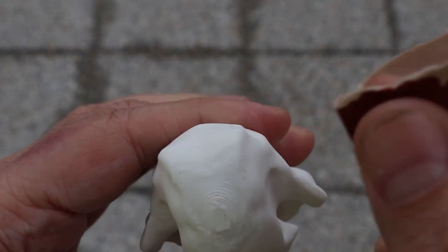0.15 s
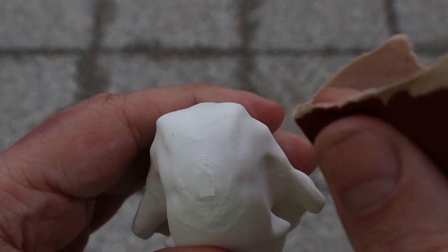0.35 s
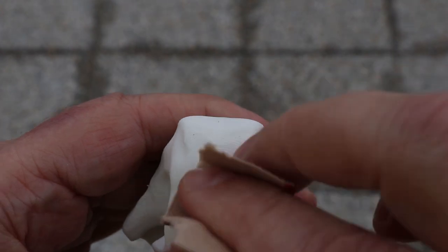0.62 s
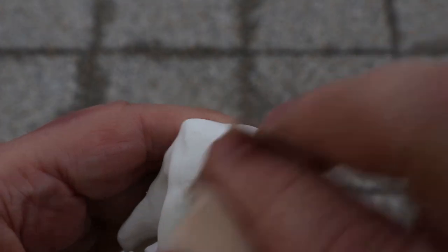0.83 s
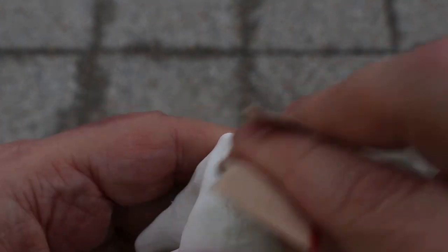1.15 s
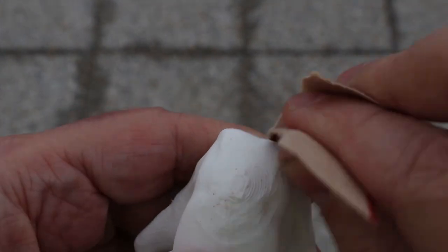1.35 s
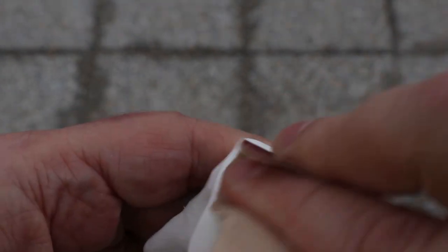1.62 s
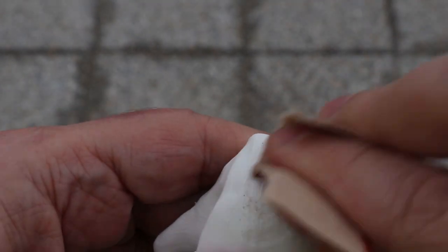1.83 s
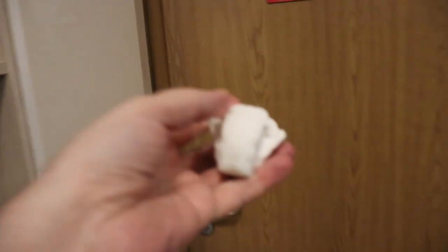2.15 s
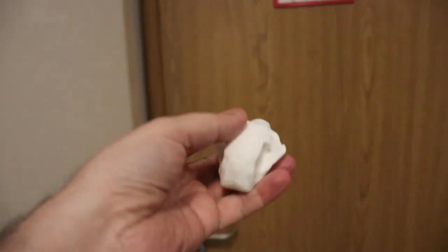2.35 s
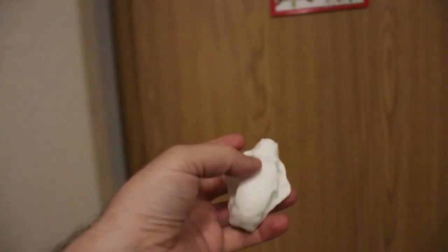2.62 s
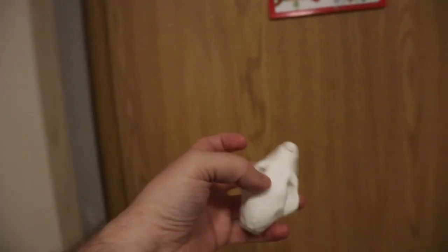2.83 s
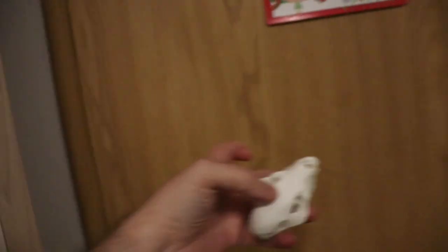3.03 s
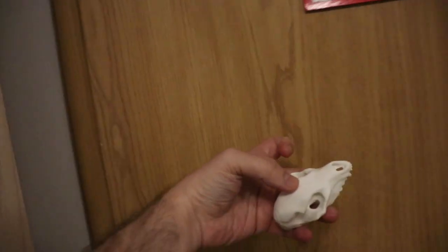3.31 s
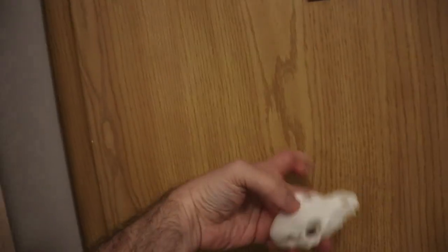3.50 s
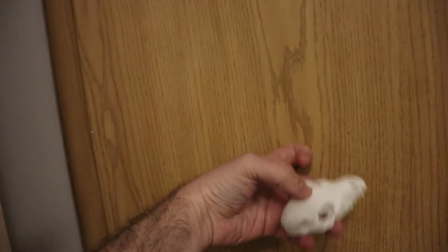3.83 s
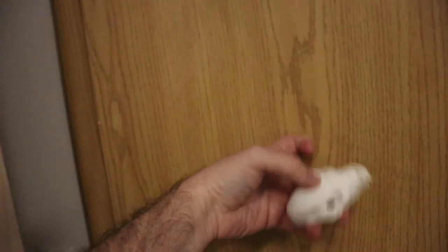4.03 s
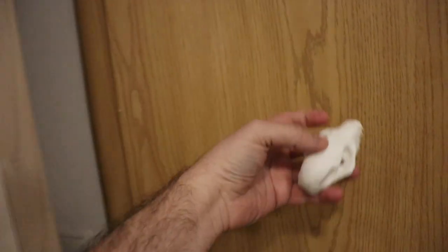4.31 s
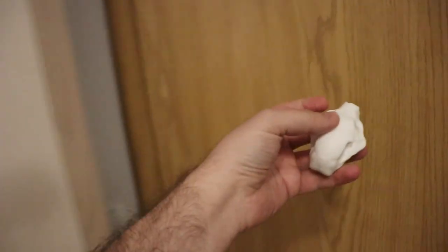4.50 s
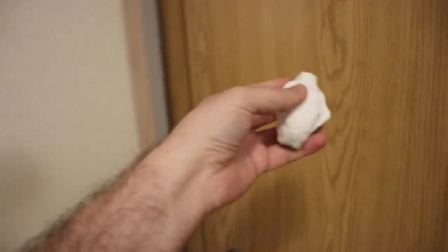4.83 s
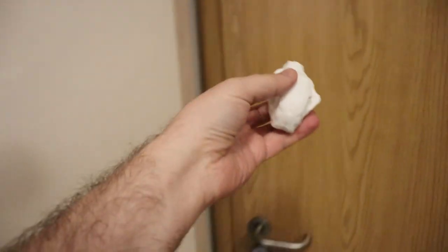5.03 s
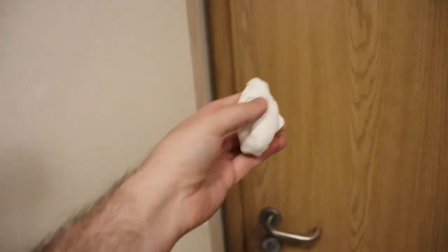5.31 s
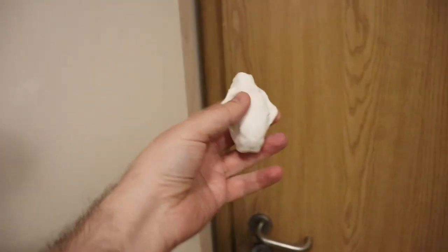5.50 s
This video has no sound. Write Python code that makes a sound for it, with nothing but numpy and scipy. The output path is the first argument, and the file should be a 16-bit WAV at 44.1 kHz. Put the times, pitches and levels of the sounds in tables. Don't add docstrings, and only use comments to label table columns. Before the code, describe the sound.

Close-up outdoors, faint traffic and brief sparrow chirps precede dry, scratchy sandpaper strokes with sharp grit snaps. A hard cut leads to a quiet hall: soft sleeve rustle and small taps, three evenly spaced knocks on a wooden door, then a small rattle and two short clacks. A handheld camera microphone adds hiss and low handling rumble.

```python
import sys
import numpy as np
from scipy import signal
from scipy.fft import rfft, irfft
from scipy.io import wavfile
from scipy.ndimage import uniform_filter1d

SR = 44100
rng = np.random.default_rng(int(sys.argv[2]) if len(sys.argv) > 2 else 0)


def nominal_scale(level):
    x = np.asarray(level, float) / 20
    return 10 ** x


def bounce(signal):
    frames = np.transpose(np.atleast_2d(signal))
    limited = np.clip(frames, -1, 1)
    pcm = np.round(limited * 32767).astype(np.int16)
    wavfile.write(sys.argv[1], SR, pcm)


N = 249332
CHANGE_S = 1.982


def time():
    return np.arange(N) / SR


def band(x, hz, width_hz, order=1):
    b, a = signal.iirpeak(min(hz, .45 * SR), hz / width_hz, SR)
    for _ in range(order):
        x = signal.lfilter(b, a, x)
    return x


def unit(x):
    return x / np.sqrt(np.mean(x ** 2))


def noise(colour):
    hz, db = np.transpose(colour)
    bins = np.fft.rfftfreq(N, 1 / SR) + 1
    gain = nominal_scale(np.interp(np.log(bins), np.log(hz), db))
    return unit(irfft(rfft(rng.standard_normal(N)) * gain, N))


def walk(rate):
    k = int(SR / rate)
    held = np.repeat(rng.standard_normal(N // k + 1), k)
    return uniform_filter1d(held, k)[:N]


def grains(rate, spread_db, bed):
    sizes = nominal_scale(spread_db * np.minimum(rng.exponential(size=N), 2.5))
    clicks = (rng.random(N) < rate / SR) * sizes * rng.standard_normal(N)
    return unit(clicks) + bed * rng.standard_normal(N)


def swells(rows, roundness):
    s, length, db, rising = np.array(rows).T[:4, :, None]
    u, rising = np.clip((time() - s) / length, 0, 1), np.clip(rising, .02, .98)
    turn = np.where(u < rising, u / rising, (1 - u) / (1 - rising))
    return nominal_scale(db) * np.sin(turn * np.pi / 2) ** roundness


def blend(gains, db=0):
    offsets = nominal_scale(np.reshape(db, (-1, 1)))
    return np.sqrt(np.sum((gains * offsets) ** 2, axis=0))


def add(out, s, x, db):
    i = int(s * SR)
    x = x[:N - i]
    out[i:i + len(x)] += x * nominal_scale(db) / np.abs(x).max()


def wash(bands):
    t = np.arange(SR // 2) / SR
    tail = 0
    for hz, width_hz, db, t60 in bands:
        tone = unit(band(rng.standard_normal(len(t)), hz, width_hz, order=2))
        tail = tail + nominal_scale(db - 60 * t / t60) * tone
    tail = tail * (1 - np.exp(-(t / 0.00065) ** 2))
    return tail / np.sqrt(np.sum(tail ** 2))


def ring(modes, shorten):
    t = np.arange(SR // 2) / SR
    return sum((-1) ** k * nominal_scale(db - 60 * t / min(t60 * shorten, .5)) * np.sin(2 * np.pi * hz * t)
               for k, (hz, db, t60) in enumerate(modes))


def push(ms):
    return np.hanning(int(ms * SR / 1000) + 3) ** 2


def sparrows():
    # start in seconds, length in seconds, first pitch in Hz, last pitch in Hz, level in dB.
    chirps = [(.156, .01, 4200, 5600, -76), (.166, .058, 5650, 4750, -64), (.235, .02, 5300, 4800, -71),
              (.262, .02, 3800, 4700, -66), (.282, .04, 4700, 4400, -73), (.638, .01, 4500, 5700, -78),
              (.648, .055, 5700, 4600, -71), (.738, .022, 4300, 4800, -71), (.87, .03, 3400, 5400, -67),
              (.905, .023, 4500, 3200, -67), (.938, .02, 3300, 4200, -68), (.958, .03, 4200, 3400, -70)]
    song, flutter, unsteady = 0, 1 + .02 * walk(150), nominal_scale(3 * walk(160))
    for s, length, from_hz, to_hz, db in chirps:
        hz = np.interp(time(), [s, s + length], [from_hz, to_hz]) * flutter
        tone = np.sin(2 * np.pi * np.cumsum(hz) / SR)
        song = song + swells([(s, length, db, .4)], roundness=0.17)[0] * unsteady * tone
    echo = signal.fftconvolve(song, wash([(4600, 4000, 0, .25)]))[:N]
    return nominal_scale(-3) * song + nominal_scale(-10) * echo


def backgrounds():
    # frequency in Hz, density in dB per Hz.
    traffic = [(76, -2), (130, -10.5), (183, -6.5), (378, -6), (427, -8), (678, -3), (829, -8.5),
               (1010, -3.5), (2320, -20.5), (3070, -25.5), (3680, -27.5), (5960, -37), (16000, -46.5)]
    # frequency in Hz, density in dB per Hz.
    hall = [(76, -61), (130, -1.5), (202, -3.5), (238, -3), (1520, -13), (1780, -15.5), (2010, -16),
            (2180, -13), (3200, -15), (15100, -20), (16000, -15)]
    street = nominal_scale(-56 + 0.94 * walk(5.16)) * noise(traffic) + sparrows()
    return np.where(time() < CHANGE_S, street, nominal_scale(-61) * noise(hall))


def handling():
    # time in seconds, rumble in dB.
    grip_levels = [(0.0, -49.5), (0.28, -50), (0.3, -41.5), (0.77, -53), (0.93, -70.5), (1.57, -60),
                   (1.82, -47.5), (1.87, -71), (2.05, -49), (2.85, -51), (3.13, -45.5), (3.41, -50.5),
                   (4.2, -51), (4.37, -53), (4.72, -44.5), (5.02, -52.5), (5.52, -43.5), (5.65, -60)]
    # start in seconds, length in seconds, level in dB, share rising (0-1).
    nudges = [
        (0, 0.13, -65, 0.3),
        (.2, 0.46, -58.5, 0.4),
        (2.26, 0.2, -60.5, 0.55),
        (2.6, 0.15, -62.5, .55),
        (2.84, 0.14, -59, 0.4),
        (3.22, 0.094, -63.5, 0.5),
        (4.12, 0.354, -44.5, 0.08),
        (4.5, 0.18, -54.5, 0.57),
        (5.26, 0.12, -46, 0.2),
    ]
    grip = nominal_scale(np.interp(time(), *np.transpose(grip_levels)) + 2 * walk(4.5))
    low = noise([(5, -34.0), (14, 9.5), (24, -2.5), (38, -2), (55, -45), (85, -39), (200, -67.0)])
    low = unit(low / np.sqrt(0.34 + uniform_filter1d(low ** 2, size=4000)))
    upper = unit(band(rng.standard_normal(N), 67.3, 56, order=2)) * nominal_scale(1.1 * walk(7))
    return grip * low + (nominal_scale(-20) * grip + blend(swells(nudges, roundness=1.9))) * upper


def cloth():
    # start in seconds, length in seconds, level in dB, share rising (0-1),
    # crispness in dB.
    movements = [(1.977, 0.59, -62, 0.06, -19), (2.155, 0.55, -52, .4, -32), (2.271, 0.051, -48, 0.01, 10),
                 (2.4, 0.27, -57, 0.57, -13), (2.66, 0.085, -54, 0.54, -16),
                 (2.578, 0.37, -55.5, 0.42, -13), (2.76, 0.35, -57, 0.51, -22), (2.9, 0.79, -66, 0.31, -24),
                 (3.997, 0.039, -62, .6, -3), (4.168, 0.077, -62, 0.33, -3.5),
                 (4.271, 0.27, -57.5, 0.66, -38), (4.55, 1, -62.5, 0.14, -21),
                 (5.076, 0.1, -52.5, 0.59, -8), (5.157, 0.18, -55, 0.2, -16), (5.322, 0.24, -56, 0.26, -11),
                 (5.478, 0.62, -60, 0.04, -35)]
    # start in seconds, length in seconds, level in dB, share rising (0-1), centre in Hz.
    scuffs = [
        (2.32, .06, -55, 0.7, 2580),
        (2.69, 0.048, -57, .45, 2410),
        (3.1, 0.38, -67.5, .45, 605),
        (5.125, .025, -56, .25, 9000),
        (5.162, .06, -59, 0.2, 2460),
        (5.367, 0.049, -54.5, .35, 7300),
    ]
    roundness = 1.64
    gains, crisp_db = swells(movements, roundness), np.array(movements)[:, -1]
    fibres = grains(rate=3700, spread_db=-3.0, bed=1.94) * nominal_scale(walk(55))
    low = unit(band(fibres, 1200, 2560, order=2))
    mid = unit(band(fibres, 3000, 6400, order=2))
    top = unit(band(fibres, 6900, 5300, order=2))
    rustle = blend(gains, -5 - 0.17 * crisp_db) * low + blend(gains) * mid + blend(gains, crisp_db) * top
    for gain, row in zip(swells(scuffs, roundness), scuffs):
        hz = row[-1]
        rustle = rustle + gain * unit(band(fibres, hz, 1.1 * hz, order=2))
    return rustle


def sanding():
    # start in seconds, length in seconds, level in dB,
    # share rising (0-1), body below 4 kHz in dB relative to the level.
    strokes = [(0.782, 0.081, -46, 0.88, 5.5), (0.867, .04, -78, 0.2, 0), (1.026, 0.055, -38, 0.56, -3.5),
               (1.082, 0.047, -67, 0.5, -8), (1.181, 0.016, -48.5, 0.15, 0), (1.205, 0.046, -65.5, .8, 5),
               (1.246, 0.041, -33, 0.14, -6.5), (1.295, 0.034, -64, .2, -1),
               (1.328, 0.057, -45.5, 0.48, -15), (1.391, 0.06, -42.5, 0.79, -3),
               (1.444, 0.033, -69.5, 0.2, 12), (1.468, 0.099, -43, 0.33, -2),
               (1.568, 0.084, -47.5, 0.5, -3.5), (1.653, 0.085, -42, 0.57, -6),
               (1.739, 0.072, -48, 0.6, -4), (1.813, 0.078, -42.5, .45, -7.5),
               (1.895, 0.08, -49.5, 0.57, -5)]
    # frequency in Hz, width in Hz, level in dB.
    paper = [
        (5500, 5200, 5),
        (7690, 1370, 6.5),
    ]
    # time in seconds, peak in dB before a
    # common 7 dB cut, centre in Hz.
    snaps = [(0.736, -46, 5140), (0.9912, -33.5, 8650), (1.0591, -13.5, 8500), (1.184, -30.5, 8600),
             (1.193, -36, 11200), (1.237, -36, 8920), (1.2457, -23, 7870), (1.25, -30, 8400),
             (1.254, -19, 8600), (1.335, -32, 7520), (1.3695, -14.5, 9800), (1.3764, -36, 9000),
             (1.4444, -35, 8620), (1.492, -23, 5700), (1.5072, -20, 5640), (1.689, -29, 7840),
             (1.7024, -34, 7760), (1.7157, -29, 10600), (1.8312, -23.5, 12500), (1.9137, -31, 7900),
             (1.9277, -26, 7600), (5.1175, -37, 7500)]
    gains, body_db = swells(strokes, roundness=1.36), np.array(strokes)[:, -1]
    grit, coarse, fine = (grains(rate=5100, spread_db=6.5, bed=0.88) * nominal_scale(3.2 * walk(70)) for _ in range(3))
    broad, ring_top = (nominal_scale(db + 2.5 * walk(45.13)) * unit(band(grit, hz, 1.42 * width_hz, order=2))
                       for hz, width_hz, db in paper)
    body = unit(band(coarse + .5 * grit, 2540, 6100, order=2))
    air = unit(band(fine + .5 * grit, 12400, 3900, order=2))
    out = blend(gains, -8 + 0.36 * body_db) * broad + blend(gains, -16.5) * ring_top
    out += blend(gains, body_db - 5.0) * body + blend(gains, -13 - 0.18 * body_db) * air
    for s, db, hz in snaps:
        snap = rng.standard_normal(130) * np.exp(-np.arange(130) / 16)
        add(out, s - .0004, band(snap, hz, 0.75 * hz, order=3), db - 7.0)
    paving = signal.fftconvolve(out, wash([(5500, 6300, 0, 0.17)]))[:N]
    return out + nominal_scale(-24) * paving * (time() < CHANGE_S)


def latch():
    # time in seconds, peak in dB, centre in Hz, rattle in ms, crack in dB re peak.
    taps = [
        (2.2735, -37, 890, 3.6, 11.5),
        (2.437, -41, 1080, 4, -36),
        (2.4755, -31, 1160, 12, -40),
    ]
    shifts = [
        (5.104, -39.5, 205, 9, -30),
        (5.113, -36.5, 96, 6.3, -30),
        (5.13, -44.5, 1480, 5.7, 11),
        (5.222, -36, 246, 4.6, -30),
        (5.233, -34, 187, 28, -32),
        (5.279, -33.5, 870, 12, -24),
        (5.288, -28, 248, 7.6, -45),
    ]
    clacks = [(5.3028, -22, 1800, 1.5, -6), (5.307, -23, 833.3, 2.7, -15), (5.312, -26, 590, 13.3, -9),
              (5.31, -31, 63, 6.4, -25), (5.506, -28.5, 59.4, 4.7, -30), (5.508, -32, 1296, 6, -40),
              (5.5155, -19.5, 1204, 2.5, -13), (5.5195, -12.5, 740.7, 1.4, -12),
              (5.517, -21, 1160, 17.2, -11.5), (5.524, -24, 403, 11, -35), (5.527, -21.5, 780, 11.4, -30)]
    # frequency in Hz, width in Hz, level in dB, 60 dB decay in seconds.
    latch_wash = [(68.6, 90, -15.5, 0.52), (158, 120, -28, .25), (274, 207, -7.5, 0.28),
                  (443, 380, -7.5, 0.11), (796, 840, 7, 0.043), (1210, 710, -12.5, 0.29),
                  (1920, 360, -17, 0.28), (3400, 2100, -2.5, 0.17), (6000, 4000, -4, 0.15)]
    out, fed, t = np.zeros(N), np.zeros(N), np.arange(SR // 10) / SR
    # bumps, bandwidth over centre, share passed on to latch and hall in dB
    for bumps, wide, ring_db in [(taps, .8, -14), (shifts, 1.4, -3.5), (clacks, 1.9, -1)]:
        for s, db, hz, rattle_ms, crack_db in bumps:
            rattle = rng.standard_normal(len(t)) * np.exp(-t * 1000 / rattle_ms)
            rattle[0] += 4
            thud = band(rattle, hz, wide * hz, order=3)
            crack = band(rattle, 5500, 2700, order=2)
            bump = thud / np.abs(thud).max() + nominal_scale(crack_db) * crack / np.abs(crack).max()
            peak_db = db + max(crack_db, 0)
            add(out, s, bump, peak_db)
            add(fed, s, bump, peak_db + ring_db)
    return out + nominal_scale(-11.0) * signal.fftconvolve(fed, wash(latch_wash))[:N]


def knocks():
    # time in seconds, peak in dB, contact in ms.
    blows = [
        (3.7379, -7.6, 1.25),
        (3.9397, -9.1, 1.25),
        (4.1373, -7.3, 1.35),
    ]
    # frequency in Hz, level in dB, 60 dB decay in seconds.
    door_modes = [(77.9, -0.5, 0.53), (128, -37, 0.19), (183, -28, 0.55), (206.1, -3, 0.46),
                  (254.7, -7, 0.4), (410, -6, 0.32), (475.5, -5.5, 0.29), (511.6, 13, 0.098),
                  (552, 3, 0.062), (582, 10, 0.12), (623, 1.5, 0.19), (670, -19, 0.16), (780, -23, 0.084),
                  (833, 14.5, 0.084), (920, -16.5, 0.45), (1033, -14, 0.28), (1110, -23, 0.38),
                  (1173, -8, 0.24), (1200, -35, 0.092), (1243, 1.5, 0.086), (1280, -30, 0.19),
                  (1430, -39, 0.46), (1647, -39, 0.52)]
    # frequency in Hz, level in dB, 60 dB decay in seconds, signed direction.
    dent_modes = [
        (545, 8, 0.012, 0.71),
        (100, -6, 0.033, -1.85),
    ]
    # frequency in Hz, width in Hz, level in dB, 60 dB decay in seconds.
    door_wash = [(64, 22, -13, 0.39), (103.6, 6.5, -7.5, 0.35), (149, 38, -23.5, 0.71),
                 (257, 130, -4.5, 0.26), (422, 68, -15, 0.22), (610, 230, -7, 0.16), (757, 110, -9, 0.2),
                 (1130, 330, -11, 0.21), (1660, 420, -20, 0.23)]
    out, t = np.zeros(N), np.arange(SR // 2) / SR
    dent = sum(way * nominal_scale(db - 60 * t / t60) * np.sin(2 * np.pi * hz * t) for hz, db, t60, way in dent_modes)
    dent[0] = 9
    edges_return = 1 - np.exp(-(t / 0.0029) ** 2)
    door = dent + nominal_scale(-19.5) * ring(door_modes, shorten=0.7) * edges_return + nominal_scale(10) * wash(door_wash)
    for s, db, ms in blows:
        add(out, s, np.convolve(push(ms), door), db)
        add(out, s, wash([(2530, 2200, 0, 0.096)]), db - 44.5)
    return out


def scene():
    return (knocks() + latch() + backgrounds() + handling() + sanding() + cloth())[None]


def band_limit(x):
    return signal.sosfilt(signal.butter(12, 16810, fs=SR, output="sos"), x)


def record(dry):
    low_pass = signal.ellip(8, .2, 45, 15800, fs=SR, output="sos")
    mix = signal.sosfilt(low_pass, dry)
    return band_limit(mix)


dry = scene()
out = record(dry)
bounce(out)
```